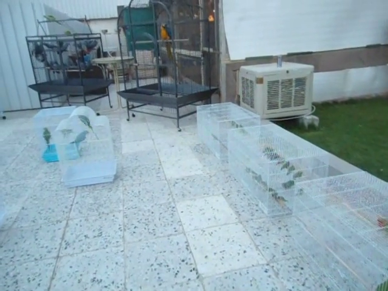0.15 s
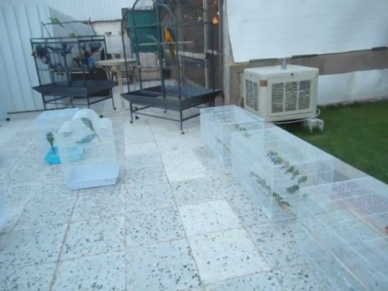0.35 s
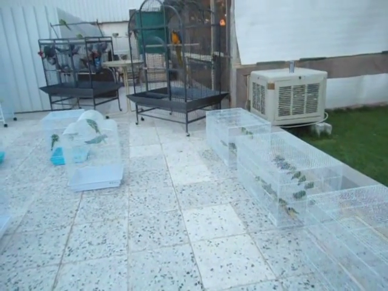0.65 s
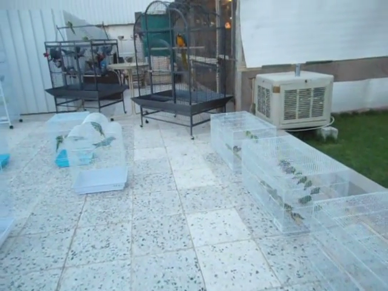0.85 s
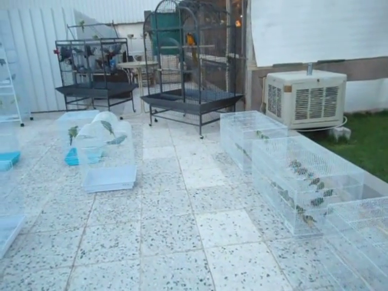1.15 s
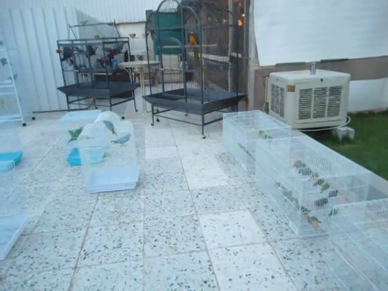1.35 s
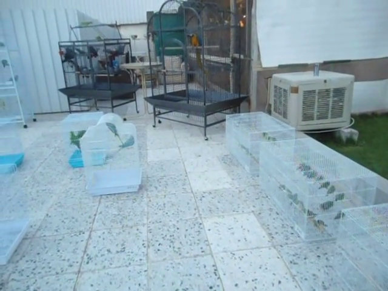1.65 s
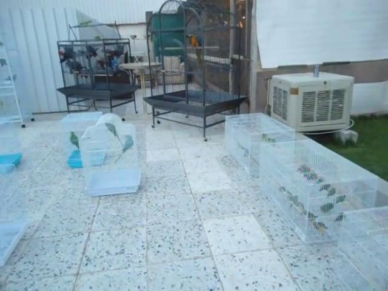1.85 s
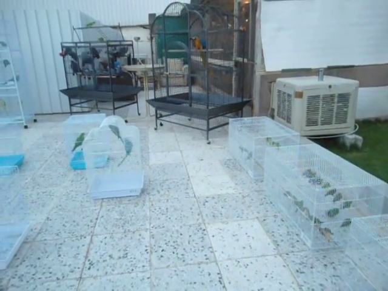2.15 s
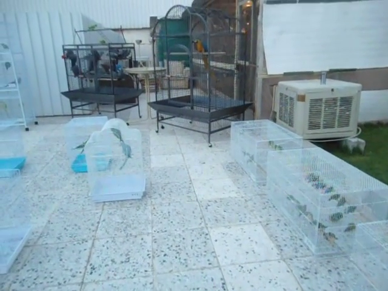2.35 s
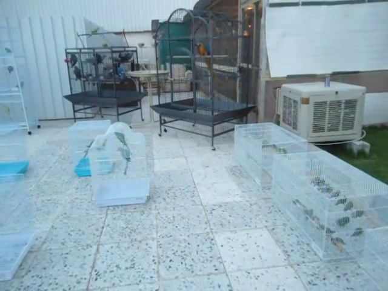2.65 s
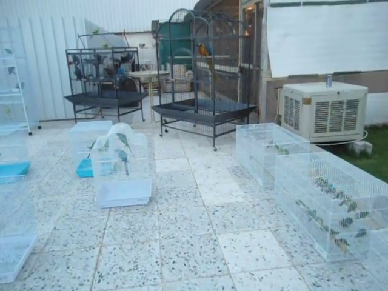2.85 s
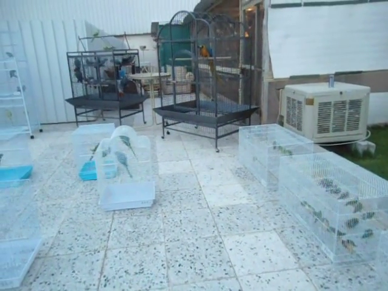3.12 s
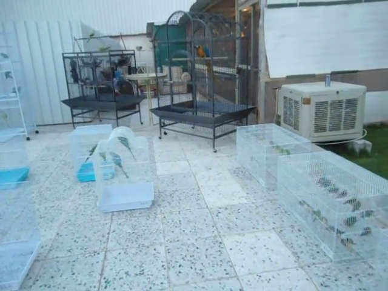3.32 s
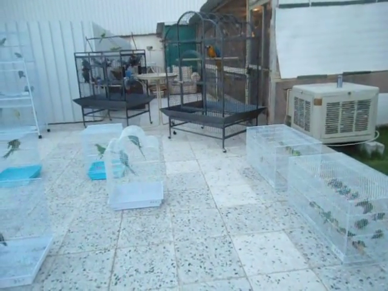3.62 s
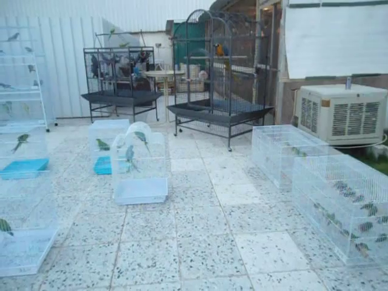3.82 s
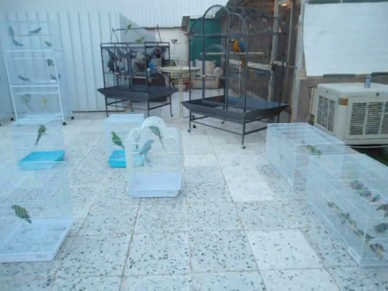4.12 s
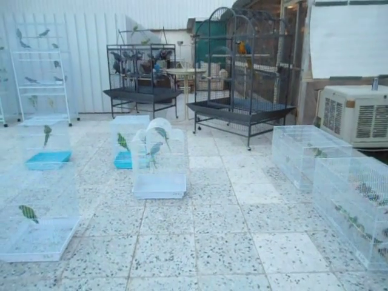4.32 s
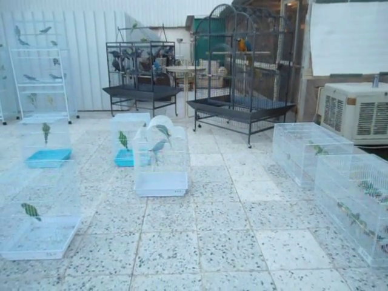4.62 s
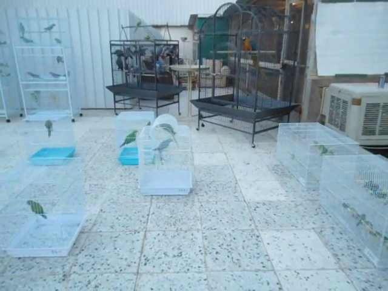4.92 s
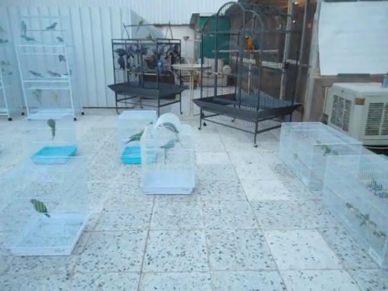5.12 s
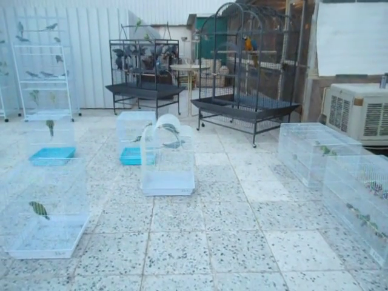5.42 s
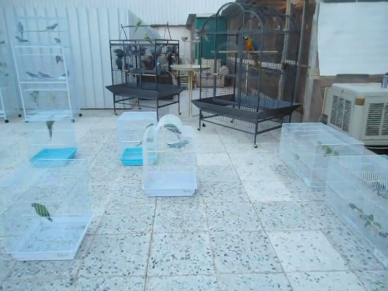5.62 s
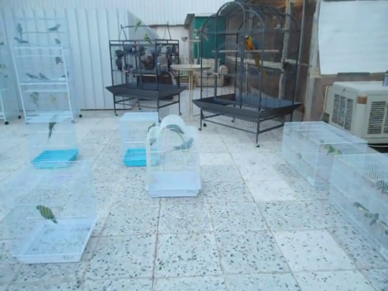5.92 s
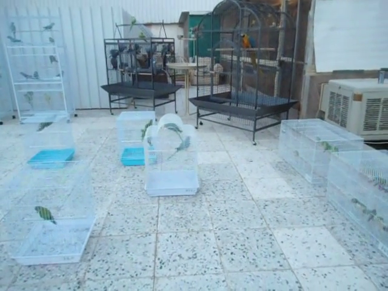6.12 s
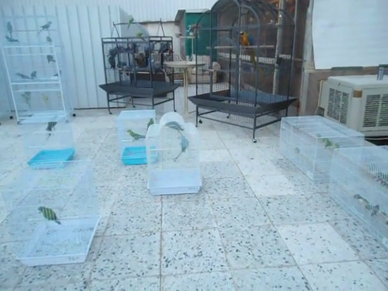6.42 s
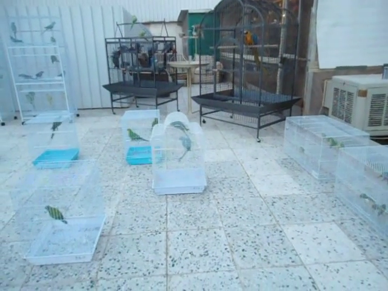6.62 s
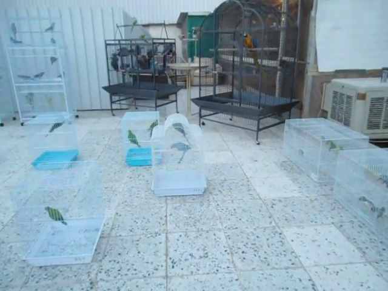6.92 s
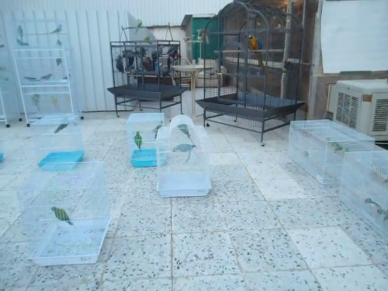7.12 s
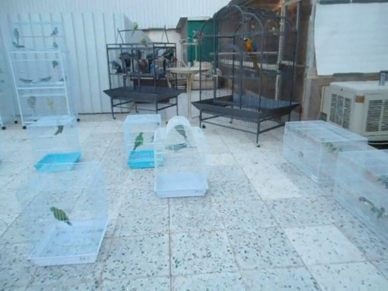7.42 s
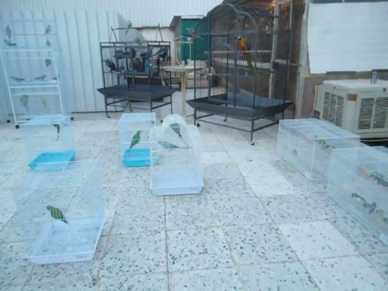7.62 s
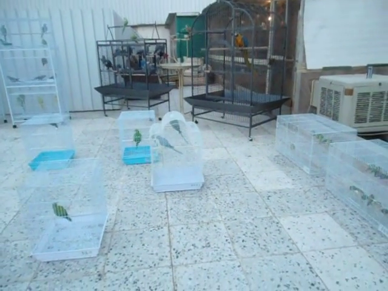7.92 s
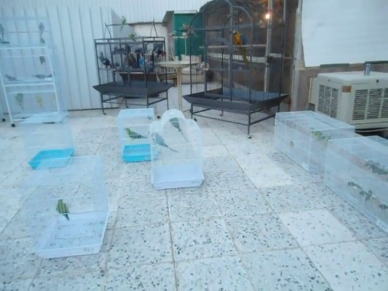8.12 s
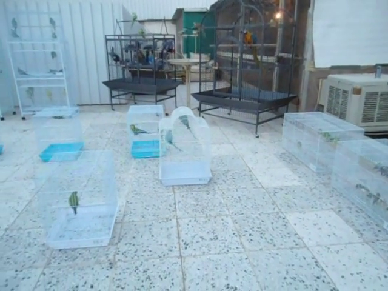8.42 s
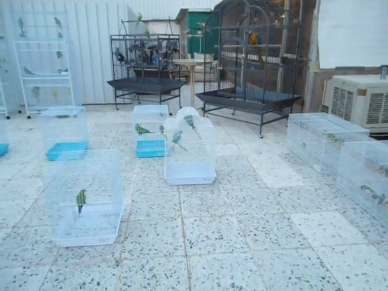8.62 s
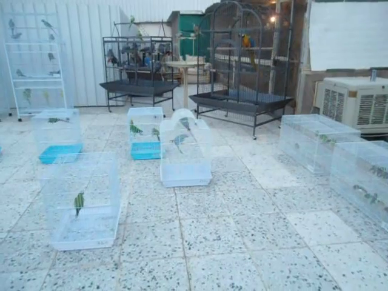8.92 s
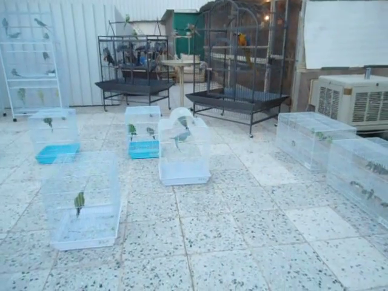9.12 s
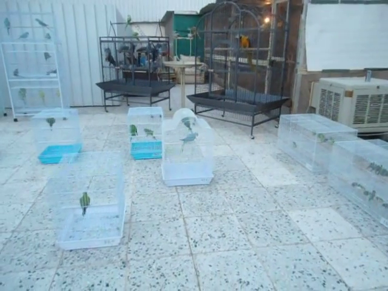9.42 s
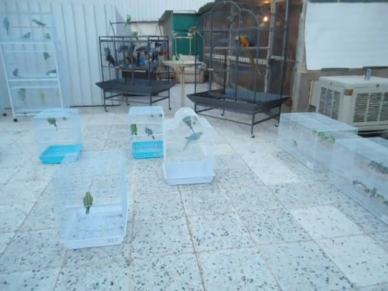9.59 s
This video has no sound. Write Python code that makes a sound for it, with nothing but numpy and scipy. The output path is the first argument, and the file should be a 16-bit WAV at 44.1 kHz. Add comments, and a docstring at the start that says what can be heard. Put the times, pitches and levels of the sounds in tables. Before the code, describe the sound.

A tiled courtyard full of caged small parrots and finches, all calling at once for nearly ten seconds. From the start, bright near whistles, a rasping screech and a hoarse warble ring out over dense, blurred chatter with short hard echoes. A farther parrot gives nasal yelps about four a second until about 5 s. Around 2 s warbles scoop quickly; from 3.2 to 3.9 s whistles crowd together in a rapid varied burst. Torn screeches follow at 4 to 5.8 s. Near calls soften around 6 s with small flicks, and yelps resume at 6.4 s. A sharp squawk at 7.2 s leads to warbles, then a brief thinning near 7.8 s. Chirps and screeches thicken again after 8 s, ending with loud harsh squawks from 9.5 s. A low wavering motor hum, rumble and light breeze puffs stay beneath. The sound is coarse, slightly metallic on top, with peaks clipping.

```python
"""Dozens of small parrots and finches call at once from cages in a tiled courtyard.
Near birds whistle arched chirps (swept sines), flick, warble and screech (sines with torn pitch).
A farther parrot yelps in runs of about four a second; hundreds of short notes make the chattering flock.
A motor hums (wavering sines) under outdoor rumble and puffs of breeze (shaped noise).
The recorder samples coarsely, which mirrors the chirps upward, and overloads on the loudest calls."""
import sys
import numpy as np
from scipy import signal
from scipy.fft import rfft, irfft
from scipy.io import wavfile
from scipy.ndimage import uniform_filter1d

SR = 44100
rng = np.random.default_rng(int(sys.argv[2]) if len(sys.argv) > 2 else 0)


def wrap_up_sound(samples):
    """Save the sound to the file named by the first command line argument, as 16-bit audio."""
    columns = np.atleast_2d(samples).T
    # keep every value between -1 and 1, then stretch to whole-number steps
    tamed = np.clip(columns, -1, 1)
    steps = np.round(tamed * 32767).astype(np.int16)
    wavfile.write(sys.argv[1], SR, steps)


N = 429975
TIME = np.arange(N) / SR


def from_db(db):
    """Decibels to amplitude gain."""
    return 10 ** (np.asarray(db) / 20)


def rms_one(x):
    """Scale to unit rms."""
    return x / np.sqrt(np.mean(x ** 2) + 1e-20)


def level(rows):
    """Gain over time, gliding in dB between (time [s], level [dB]) rows."""
    return from_db(np.interp(TIME, *np.transpose(rows)))


def band(x, hz, kind, order=2):
    """Butterworth filter."""
    sections = signal.butter(order, hz, kind, fs=SR, output="sos")
    return signal.sosfilt(sections, x + 1e-18)


def flutter(rate_hz):
    """Random wavering up to about the given rate, at unit rms."""
    noise = rng.standard_normal(N + SR)
    return rms_one(band(noise, rate_hz, "low")[SR:])  # the first second lets the filter settle


def add(track, start, sound):
    """Mix a sound into a track at a time in seconds."""
    i = int(np.clip(start * SR, 0, N))
    track[i:i + len(sound)] += sound[:N - i]


def span(start, length):
    """Sample indices of a call and its progress from -1 to 1."""
    n = max(int(length * SR), 64)
    return (int(start * SR) + np.arange(n)) % N, np.linspace(-1, 1, n)


def swell(u, edge):
    """A call opens and closes softly, each over the given share of half its length."""
    return np.sin(np.pi / 2 * np.clip((1 - abs(u)) / edge, 0, 1))


def arch(u, first_hz, middle_hz, last_hz, bend):
    """Pitch follows the tension of the syrinx: a higher bend is flatter in the middle, quicker at the ends."""
    end_hz = np.where(u < 0, first_hz, last_hz)
    return middle_hz + (end_hz - middle_hz) * abs(u) ** bend


def phase(hz):
    """Running phase of a moving pitch."""
    return 2 * np.pi * np.cumsum(hz) / SR


def reverberation(x, t60):
    """Diffuse sound between the walls: it builds up briefly, then falls 60 dB in t60 seconds."""
    t = TIME[:SR]
    build_up = 1 - np.exp(-t / 0.016)
    tail = rng.standard_normal(SR) * from_db(-60 * t / t60) * build_up
    return signal.fftconvolve(x, tail / np.sqrt(np.sum(tail ** 2)))[:N]


def courtyard(x, wet_db, t60):
    """Direct sound, a few hard reflections and the diffuse tail."""
    # early reflections off tiles and walls: (delay [s], level [dB])
    reflections = [(.0043, -17), (.019, -24.5), (0.033, -13.5), (.052, -12), (0.083, -16)]
    early = sum(from_db(db) * np.interp(TIME - delay, TIME, x, left=0) for delay, db in reflections)
    return x + early + from_db(wet_db) * reverberation(x, t60)


def background(ambience_db=-21.5, breeze_db=-3, calm_db=-29):
    """Steady outdoor rumble, a light breeze that comes in puffs, and a slightly wavering motor hum."""
    # colour of the outdoor rumble: (frequency [Hz], relative spectral level [dB])
    rumble_colour = [(15, -10), (35, -19), (60, -10.5), (95, -7.5), (160, -15.5), (300, -15.5), (550, -20),
                     (900, -17.5), (1500, -26), (5000, -23)]
    # puffs of breeze over the microphone: (peak time [s], half width at 1/e [s], level before breeze_db [dB])
    puffs = [(.24, 0.13, -12.5), (.8, 0.14, -18), (1.221, 0.21, -15.5), (2.12, 0.18, -21), (3.35, .22, -19),
             (4.78, .06, -18)]
    # partials of the motor hum: (frequency [Hz], rms level [dB])
    hum_partials = [(57, -33.5), (114, -38), (119.5, -35), (174, -45.5), (199, -46.5), (239, -52.5)]

    colour_hz, colour_db = np.transpose(rumble_colour)
    log_hz = np.log(np.fft.rfftfreq(N, 1 / SR) + 1)
    colour = from_db(np.interp(log_hz, np.log(colour_hz), colour_db))
    air = rms_one(irfft(rfft(rng.standard_normal(N)) * colour, N))

    wind = from_db(calm_db)
    for peak, width, db in puffs:
        wind = wind + from_db(db) * np.exp(-((TIME - peak) / width) ** 2)
    breeze = wind * rms_one(band(flutter(28), 9.7, "high"))

    hum = np.zeros(N)
    for hz, db in hum_partials:
        hum += np.sqrt(2) * from_db(db) * np.sin(phase(hz * (1 + 0.012 * flutter(4))))
    return from_db(ambience_db) * air + from_db(breeze_db) * breeze + hum


def flock(low_hz, high_hz, rough, glide, wet_db, count):
    """Many farther birds: short gliding notes in one register, blurred by the yard, at an even level."""
    out, waver = np.zeros(N), flutter(318)
    for when, size, height, loud, rise, drop in rng.random((count, 6)):
        start = when * N / SR - .02
        at, u = span(start, .01 + .04 * size ** 2)
        hz = low_hz + (high_hz - low_hz) * height
        first_hz = hz * (1 - glide * (rise - .4))
        last_hz = hz * (1 - glide * (drop - .5))
        pitch = arch(u, first_hz, hz, last_hz, bend=1.4) * (1 + rough * waver[at])
        add(out, start, from_db(-16 * loud) * swell(u, 0.1) * np.sin(phase(pitch)))
    out = out + from_db(wet_db) * reverberation(out, t60=0.36)
    running_power = np.abs(uniform_filter1d(out ** 2, SR // 14))
    return out / np.sqrt(running_power + 1e-6)


def joining_in(calls, own, answer_db, settle_s):
    """Gain of the flock: its own chatter, plus a swell with every near call that soon settles."""
    keep = np.exp(-1 / (settle_s * SR))
    excitement = signal.lfilter([1 - keep], [1, -keep], calls ** 2 + 1e-18)
    return np.sqrt(own ** 2 + from_db(answer_db) ** 2 * excitement)


def yelps(length=0.0607, fall=0.066, rough=0.026, third_db=-4, gain_db=1.5):
    """Short nasal notes of three harmonics that sag in pitch."""
    # yelps of a farther parrot, levels before gain_db:
    # (start [s], middle pitch [Hz], fundamental level [dB], octave level [dB])
    yelp_notes = [(0, 946, -30, -29), (0.17, 912, -26, -26), (0.381, 933, -32, -25.5),
                  (0.61, 924, -30.0, -25), (0.85, 953, -32, -22.5), (1.09, 914, -26.5, -23.0),
                  (1.32, 947, -31.5, -28), (1.58, 922, -28, -28), (1.829, 942, -28.5, -24),
                  (2.09, 875, -29, -43), (2.319, 959, -28, -24), (2.6, 884, -30.5, -31),
                  (2.84, 871, -27, -30), (3.025, 915, -27.5, -21.5), (3.27, 898, -33.5, -23),
                  (3.67, 837, -30, -41), (3.94, 907, -28, -32), (4.19, 857, -33, -33),
                  (4.45, 849, -32, -21.5), (4.69, 854, -32.5, -28.5), (4.931, 823, -35.5, -29.5),
                  (6.39, 860, -36, -44), (6.62, 881, -28, -26), (6.83, 913, -26.5, -23.5),
                  (7.061, 873, -23.5, -26.5), (7.341, 963, -30, -31), (7.539, 970, -30, -27.5),
                  (7.82, 792, -32.5, -36), (8.02, 753, -33, -36), (8.171, 924, -28.5, -40),
                  (8.301, 888, -28, -38), (8.63, 870, -32.5, -37), (9.251, 944, -27.5, -26),
                  (9.45, 1036, -29, -20.5)]
    out, waver = np.zeros(N), flutter(360)
    for start, hz, first_db, octave_db in yelp_notes:
        at, u = span(start, length)
        sag = fall * u / 2 + fall * u ** 2 / 2
        angle = phase(hz * (1 - sag + rough * waver[at]))
        upper = np.sin(2 * angle) + from_db(third_db) * np.sin(3 * angle)
        voice = from_db(first_db) * np.sin(angle) + from_db(octave_db) * upper
        add(out, start, np.sqrt(2) * from_db(gain_db) * swell(u, 0.18) * voice)
    return out


def screeches(buzz_hz=480, buzz_share=0.91, chaos=0.503, trill_hz=105, trill_share=0.57, gain_db=-1.0):
    """The two sides of the syrinx beat irregularly and tear the tone into a rasp, streaked by a fast rising trill."""
    # harsh screeches: (start [s], length [s], start pitch [Hz], end pitch [Hz],
    # rasp [share of pitch per unit of tear], level before gain_db [dB])
    harsh_calls = [(0.108, 0.14, 3213, 2900, 0.17, -13), (1.732, 0.053, 3280, 4040, .16, -21),
                   (4.056, 0.098, 2404, 3246, 0.33, -14), (4.284, 0.12, 2310, 3113, 0.35, -15.5),
                   (4.384, 0.067, 3290, 3000, 0.089, -17), (4.923, .12, 2700, 2875, 0.3, -18.5),
                   (5.42, .1, 2502, 3194, 0.25, -17), (5.463, 0.043, 4950, 5070, 0.072, -22),
                   (5.577, .25, 3660, 3246, 0.137, -18), (7.189, .075, 2953, 2650, 0.097, -10.5),
                   (7.82, 0.04, 4200, 4210, 0.2, -16.5), (8.672, 0.1, 3080, 2660, 0.15, -16),
                   (8.78, 0.145, 4230, 4280, 0.053, -16), (8.766, 0.14, 3010, 2766, 0.1, -17.5),
                   (9.491, 0.16, 4200, 3620, 0.127, -8), (9.503, 0.13, 1899, 2337, 0.33, -11.5),
                   (8.788, 0.088, 4980, 5050, 0.055, -13), (9.633, 0.16, 2840, 2730, 0.22, -7)]
    out, waver, shake = np.zeros(N), flutter(957), flutter(170)
    buzz = np.sin(phase(buzz_hz * (1 + 0.16 * flutter(89.5))))
    trill = signal.sawtooth(phase(trill_hz * (1 + .2 * flutter(30))))
    tear = buzz_share * buzz + trill_share * trill + chaos * waver
    for start, length, first, last, rasp, db in harsh_calls:
        at, u = span(start, length)
        pitch = np.interp(u, [-1, 1], [first, last]) * (1 + rasp * tear[at])
        gain = np.sqrt(2) * from_db(db + gain_db + 2 * shake[at])
        add(out, start, gain * swell(u, 0.21) * np.sin(phase(pitch)))
    return out


def chirps(jitter=0.007, wobble=0.01294, shimmer_db=2.0, under_db=-21, attack_share=0.095, gain_db=1.47):
    """Nearly pure whistles; the throat favours the second harmonic, so a faint line lies an octave below."""
    # whistled chirps: (start [s], length [s], middle pitch [Hz], level before gain_db [dB], contour name)
    whistle_notes = [(0.113, 0.042, 3180, -8, "rise"), (0.148, 0.039, 3755, -10.5, "arch"),
                     (0.194, 0.05, 3073, -12, "fall"), (.259, 0.052, 2824, -11, "fall"),
                     (0.313, .08, 4974, -9.5, "climb"), (0.499, .012, 4290, -9, "sweep"),
                     (0.561, 0.052, 4980, -6.5, "arch"), (0.791, 0.026, 4030, -11.5, "sweep"),
                     (0.811, 0.061, 4920, -10, "hook"), (1.018, 0.074, 4874, -8.5, "climb"),
                     (1.196, 0.061, 3185, -12.5, "fall"), (1.243, 0.087, 4970, -9.5, "climb"),
                     (1.491, 0.045, 4800, -7.5, "arch"), (1.524, 0.046, 4860, -12, "arch"),
                     (1.701, 0.046, 3434, -14, "arch"), (1.736, 0.026, 4000, -13.5, "sweep"),
                     (1.751, .028, 3476, -11.5, "sweep"), (1.758, 0.087, 4750, -7.5, "climb"),
                     (1.86, 0.051, 4430, -16.5, "level"), (1.999, 0.082, 4720, -10, "climb"),
                     (2.261, 0.077, 5124, -11.5, "arch"), (2.489, 0.03, 3720, -13, "rise"),
                     (2.516, 0.068, 4856, -7.5, "hook"), (2.673, 0.044, 4570, -10.5, "level"),
                     (2.744, 0.088, 4800, -14.5, "climb"), (2.921, 0.035, 4090, -16, "rise"),
                     (2.978, 0.075, 4780, -10.5, "climb"), (3.049, 0.061, 4390, -11.5, "fall"),
                     (3.125, .035, 3450, -14, "fall"), (3.19, 0.046, 3600, -14.5, "rise"),
                     (3.231, 0.063, 4460, -10, "arch"), (3.292, 0.034, 3895, -12, "level"),
                     (3.345, .045, 3440, -14, "swoop"), (3.396, 0.029, 4050, -5.5, "rise"),
                     (3.428, 0.045, 4427, -7.5, "rise"), (3.456, 0.027, 3150, -13.5, "fall"),
                     (3.5, 0.027, 3620, -10, "level"), (3.531, 0.051, 4490, -9, "level"),
                     (3.569, 0.026, 3750, -12, "level"), (3.585, 0.065, 4620, -8.5, "arch"),
                     (3.645, 0.052, 4125, -6, "rise"), (3.693, 0.059, 4810, -12, "rise"),
                     (3.7, .065, 2400, -20, "level"), (3.735, 0.03, 2090, -13, "level"),
                     (3.782, 0.038, 2050, -6.5, "level"), (3.833, .086, 4795, -8.5, "climb"),
                     (3.943, .018, 2540, -21, "level"), (4.03, .04, 1890, -15.5, "level"),
                     (4.113, .07, 4600, -12.5, "arch"), (4.371, .056, 4820, -8, "arch"),
                     (4.518, 0.033, 4650, -7.5, "rise"), (4.54, .06, 4980, -17, "arch"),
                     (4.612, 0.085, 4727, -9, "climb"), (4.691, .03, 3220, -14.5, "fall"),
                     (4.735, 0.024, 3200, -17, "rise"), (4.817, .027, 2626, -11, "swoop"),
                     (4.872, 0.063, 4750, -9.5, "arch"), (4.995, 0.03, 4300, -13.5, "level"),
                     (5.043, 0.028, 4580, -11, "level"), (5.084, 0.022, 4030, -9, "rise"),
                     (5.192, 0.15, 1652, -20, "level"), (5.424, .07, 1700, -17, "level"),
                     (5.823, 0.089, 1627, -17.5, "swoop"), (6.024, .05, 5230, -18.5, "arch"),
                     (6.142, 0.041, 4410, -11.5, "rise"), (6.237, 0.061, 1745, -19, "level"),
                     (6.345, 0.073, 4295, -13, "level"), (6.506, 0.064, 3720, -8.5, "arch"),
                     (6.558, 0.11, 4800, -18, "hook"), (6.772, 0.098, 5040, -13, "climb"),
                     (6.819, 0.077, 3630, -14, "hook"), (6.922, .043, 3680, -21, "rise"),
                     (7.005, 0.063, 4560, -12, "arch"), (7.268, .07, 5040, -12.5, "arch"),
                     (7.464, .04, 4450, -18, "rise"), (7.536, .05, 4500, -17, "fall"),
                     (7.86, 0.031, 4010, -15.5, "level"), (7.96, 0.063, 3760, -13, "hook"),
                     (8.06, .07, 3400, -7.5, "fall"), (8.149, .055, 4360, -14, "fall"),
                     (8.343, 0.1, 4750, -15, "hook"), (8.416, 0.052, 1374, -13.5, "rise"),
                     (8.447, 0.028, 3390, -10.5, "fall"), (8.623, 0.047, 3418, -4.5, "arch"),
                     (8.692, 0.041, 2110, -15.5, "fall"), (8.68, 0.048, 4720, -20, "fall"),
                     (8.767, 0.063, 4690, -15, "fall"), (8.922, 0.051, 4790, -10, "level"),
                     (8.93, .053, 3490, -13, "fall"), (9.04, .11, 4140, -17, "level"),
                     (9.08, .07, 2380, -18.5, "level"), (9.207, 0.077, 4810, -11, "rise"),
                     (9.405, 0.046, 4826, -7, "arch"), (9.477, 0.028, 3690, -9, "level"),
                     (9.582, 0.068, 3620, -8.5, "fall")]
    # pitch contours that the whistles share: name -> (start / middle pitch [ratio],
    # end / middle pitch [ratio], bend [exponent: 1 straight, 3 flat in the middle])
    pitch_shapes = {"arch": (.86, .88, 2.8), "climb": (.72, .91, 2.4), "hook": (.9, .76, 2.6),
                    "level": (.96, .99, 2.0), "rise": (.91, 1.06, 1.4), "sweep": (.87, 1.18, 1.0),
                    "swoop": (.72, 1.1, 1.8), "fall": (1.07, .9, 1.3)}
    out, waver, sway, shake = np.zeros(N), flutter(350), flutter(70.7), flutter(97)
    for start, length, hz, db, contour in whistle_notes:
        at, u = span(start, length)
        first, last, bend = pitch_shapes[contour]
        unsteady = 1 + jitter * waver[at] + wobble * sway[at]
        angle = phase(arch(u, first * hz, hz, last * hz, bend) * unsteady)
        tone = np.sin(angle) + from_db(under_db) * np.sin(angle / 2)
        attack = 1 - np.exp(-(u + 1) / 2 / attack_share)
        opening = swell(u, .14) * (1 - .35 * u ** 2) * attack
        gain = np.sqrt(2) * from_db(db + gain_db + shimmer_db * shake[at])
        add(out, start, gain * opening * tone)
    return out


def warbles(swing_hz=680, cycle_s=0.037, under_db=-17, gain_db=-2.0):
    """A hoarse second harmonic with faint neighbours dips in quick scoops and snaps back up between them."""
    # hoarse warbles: (start [s], length [s], centre pitch [Hz], level before gain_db [dB])
    warble_notes = [(0.202, 0.068, 2880, -13), (1.084, 0.1, 2680, -12), (1.254, 0.05, 2580, -12.5),
                    (2.055, 0.064, 2896, -8.5), (2.219, 0.043, 2577, -11.5), (2.279, 0.089, 2613, -10.5),
                    (4.886, 0.17, 2723, -13), (7.342, 0.043, 2608, -7), (7.402, 0.087, 2652, -8.5),
                    (8.194, 0.14, 2670, -10.5), (9.248, 0.073, 2687, -12.5), (9.305, 0.092, 2650, -11.5)]
    out, shake = np.zeros(N), flutter(200)
    hoarse = 1 + .05 * flutter(400)
    for start, length, hz, db in warble_notes:
        at, u = span(start, length)
        scoop = abs(np.sin(np.pi * (u + 1) / 2 * length / cycle_s))
        pitch = hz * hoarse[at] - swing_hz * (scoop - 2 / np.pi)  # 2/pi is the mean scoop
        angle = phase(pitch)
        neighbours = np.sin(angle / 2) + np.sin(angle + angle / 2)
        tone = np.sin(angle) + from_db(under_db) * neighbours
        gain = np.sqrt(2) * from_db(db + gain_db + 2.8 * shake[at])
        add(out, start, gain * swell(u, 0.14) * tone)
    return out


def flicks(length=0.01296, rise=0.1434, rough=0.074):
    """Click-like notes: the pitch shoots up within a few milliseconds."""
    # sharp upward flicks of the voice: (start [s], middle pitch [Hz], level [dB])
    flick_notes = [(.34, 4230, -10), (.478, 3030, -11), (.543, 3780, -10), (.63, 4004, -10),
                   (1.312, 4440, -9), (1.43, 4290, -10), (2.966, 4700, -7), (3.106, 4470, -4),
                   (3.143, 3410, -11.5), (3.245, 4780, -9.5), (3.952, 5040, -6), (4.277, 2090, -13.5),
                   (4.46, 3440, -6.5), (5.2, 1875, -17), (5.224, 3190, -17), (5.91, 3390, -15.5),
                   (5.957, 4240, -11.5), (5.984, 4900, -12), (6.062, 3850, -14.5), (6.104, 4760, -15.5),
                   (6.215, 4160, -9), (6.217, 3110, -13), (6.609, 3920, -12), (6.92, 3540, -7),
                   (7.042, 4970, -7.5), (7.052, 4590, -7), (7.828, 4400, -11.5), (7.858, 3990, -10.5),
                   (8.075, 3720, -11), (8.338, 3460, -5), (8.603, 3770, -6.5), (8.613, 4540, -6.5),
                   (8.823, 4350, -5)]
    out, waver = np.zeros(N), flutter(1100)
    for start, hz, db in flick_notes:
        at, u = span(start, length)
        pitch = hz * (1 + rise * u + rough * waver[at])
        add(out, start, np.sqrt(2) * from_db(db) * swell(u, 0.86) * np.sin(phase(pitch)))
    return out


def scene(low_db=0.5, mid_db=-1.0, high_db=-1.5):
    """Near birds, the yelping parrot, the flock that joins in with the near calls, and the background."""
    # the flock's own chatter by register, before the trims above: (time [s], level [dB])
    low_chatter = [(0, -17), (.15, -32), (.8, -33.5), (1.7, -27), (2.7, -32), (3.6, -26), (4.0, -31.5),
                   (5.05, -23.5), (5.7, -32), (6.9, -33), (7.75, -49), (8.4, -27.5), (9.75, -23)]
    mid_chatter = [(0, -18.5), (.4, -22), (.75, -28), (1.55, -20), (2.35, -19.5), (2.85, -25), (3.9, -16.5),
                   (4.5, -19.5), (5.22, -19.5), (5.38, -24.5), (5.55, -21.5), (6.3, -22.5), (7.1, -31),
                   (7.55, -21.5), (7.78, -29.5), (8.15, -18), (9.2, -15.5), (9.75, -12.5)]
    high_chatter = [(0, -15), (.45, -18.5), (.75, -21), (1.8, -14), (2.85, -19), (3.55, -15), (4.0, -18.5),
                    (5.05, -16), (5.2, -28.5), (5.5, -33.5), (6.1, -17.5), (7.2, -20.5), (7.55, -12.5),
                    (7.76, -22), (8.0, -17), (8.85, -13), (9.15, -17.5), (9.75, -13.5)]

    whistles = chirps() + flicks()
    hoarse = warbles() + screeches()
    calls = whistles + hoarse
    near = courtyard(calls, wet_db=-10.5, t60=0.42)
    far = courtyard(yelps(), wet_db=0.5, t60=0.36)

    low_own = from_db(low_db) * level(low_chatter)
    mid_own = from_db(mid_db) * level(mid_chatter)
    high_own = from_db(high_db) * level(high_chatter)
    # the low register answers hoarse calls; the others answer the lower and upper part of all near calls
    low = joining_in(hoarse, low_own, answer_db=-16, settle_s=0.026)
    mid = joining_in(band(calls, 2100, "low"), mid_own, answer_db=-15.5, settle_s=0.047)
    high = joining_in(band(calls, 3400, "high"), high_own, answer_db=-8, settle_s=0.048)
    chatter = (low * flock(782, 1700, rough=0.08, glide=0.46, wet_db=-3.5, count=1100)
               + mid * flock(1650, 3050, rough=0.026, glide=0.397, wet_db=-4.5, count=850)
               + high * flock(2950, 4850, rough=0.021, glide=0.3208, wet_db=-4, count=1100))
    return (near + far + chatter + background())[None]


def record(dry, ceiling=1.0, hardness=10.2, cutoff_hz=16500):
    """Sampling at a quarter rate with a gentle smoothing filter mirrors the highest notes upward; peaks then clip."""
    every_fourth = np.arange(N) % 4 == 0
    sparse = band(dry, 5400, "low", order=10) * 4 * every_fourth  # times 4 makes up for the zeros
    smoothing = signal.firwin(57, SR / 8, window=("kaiser", 8), fs=SR)
    smooth = signal.fftconvolve(sparse, smoothing[None], "same")
    clipped = smooth / (1 + abs(smooth / ceiling) ** hardness) ** (1 / hardness)
    return band(clipped, cutoff_hz, "low", order=14)


dry = scene()
out = record(dry)
wrap_up_sound(out)
```